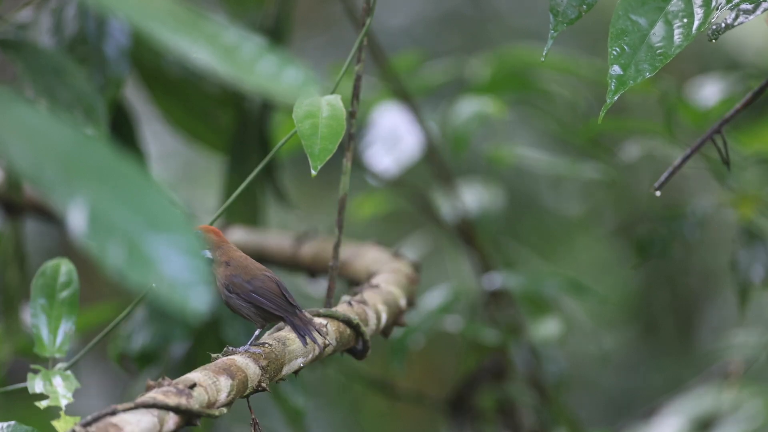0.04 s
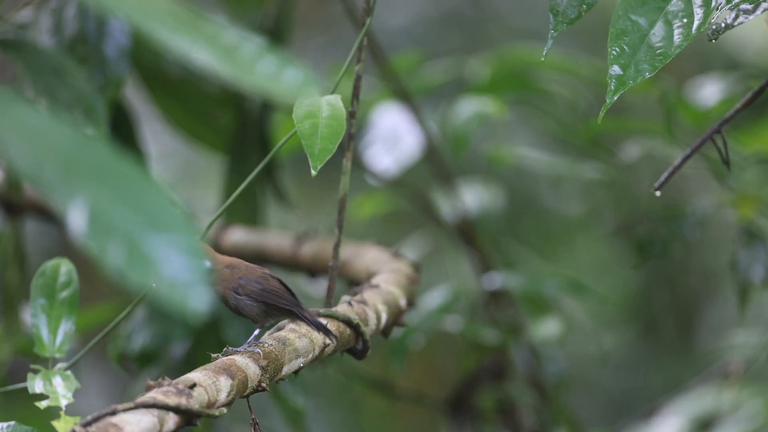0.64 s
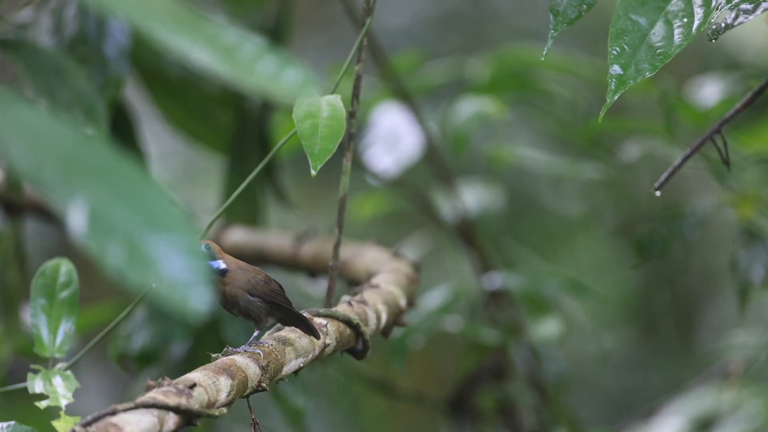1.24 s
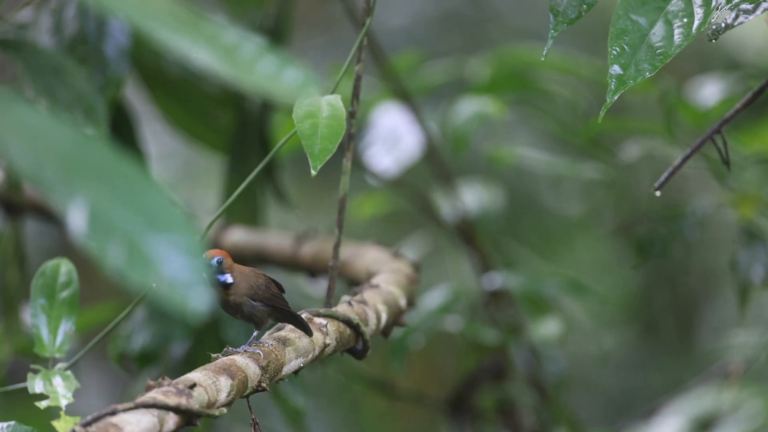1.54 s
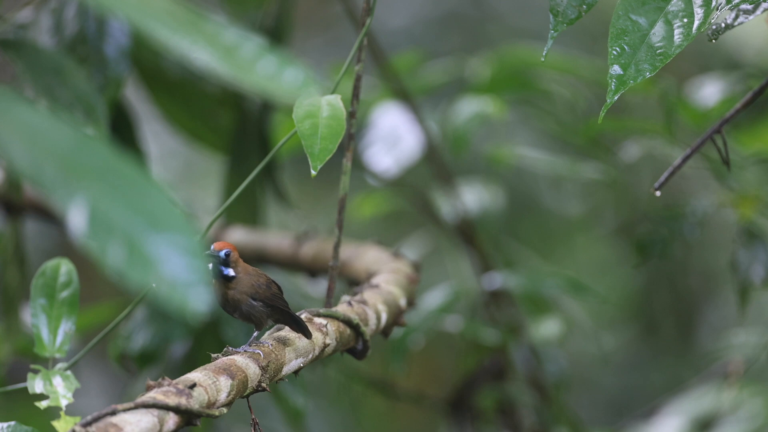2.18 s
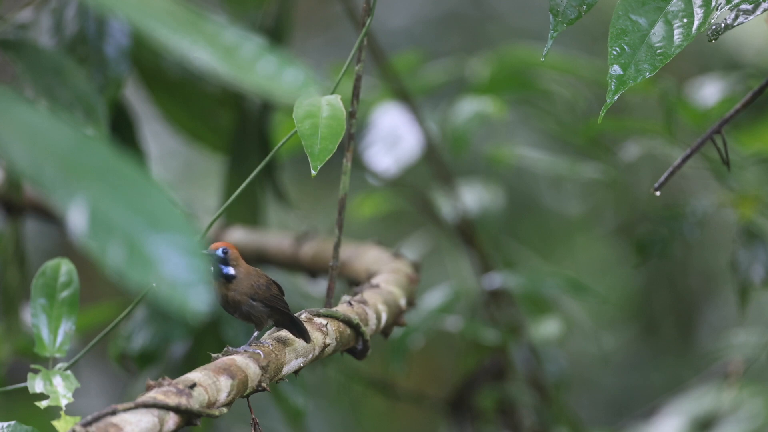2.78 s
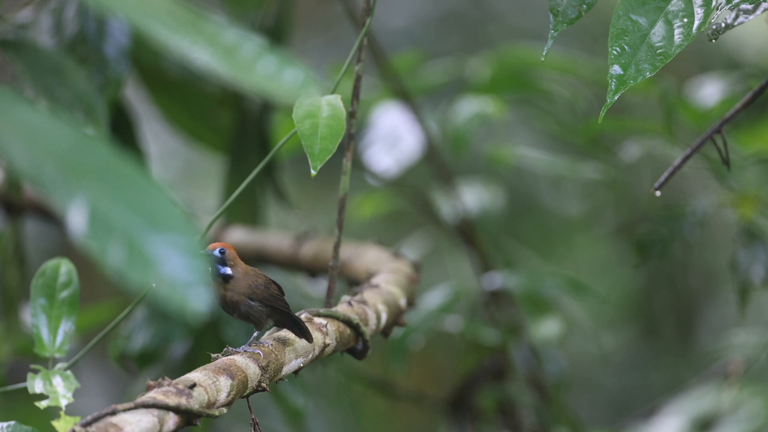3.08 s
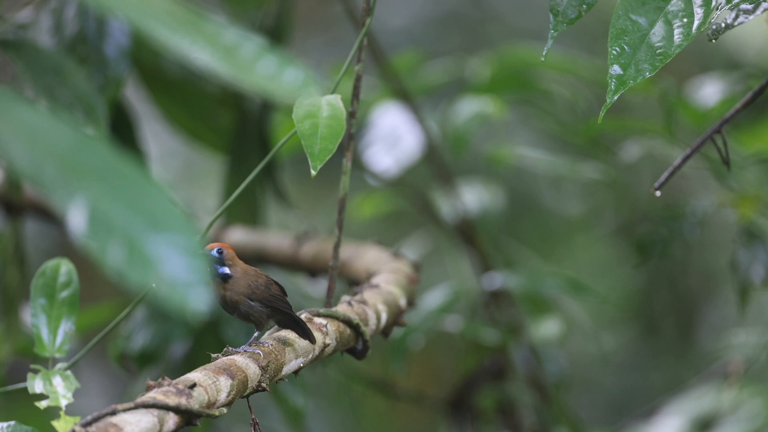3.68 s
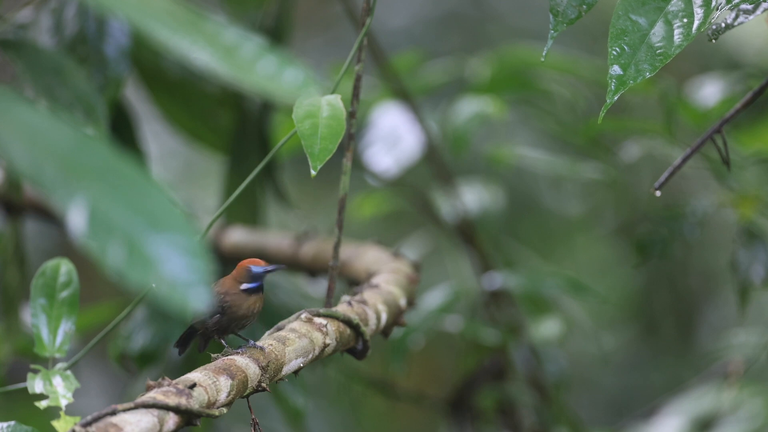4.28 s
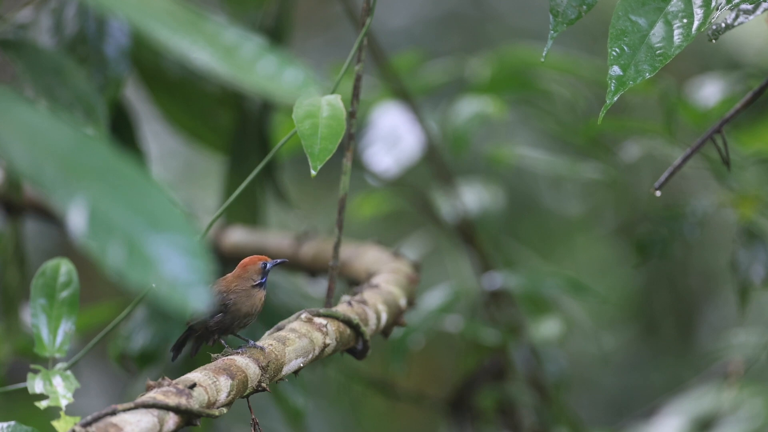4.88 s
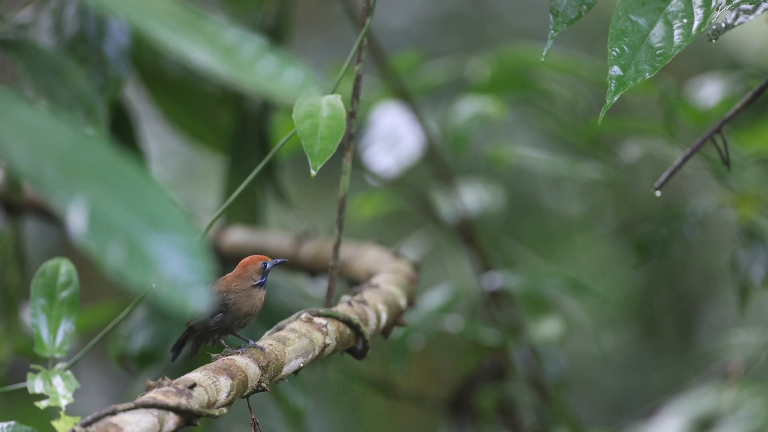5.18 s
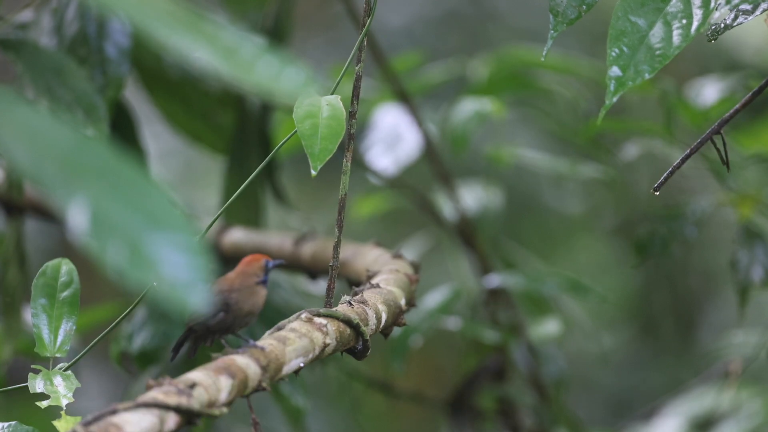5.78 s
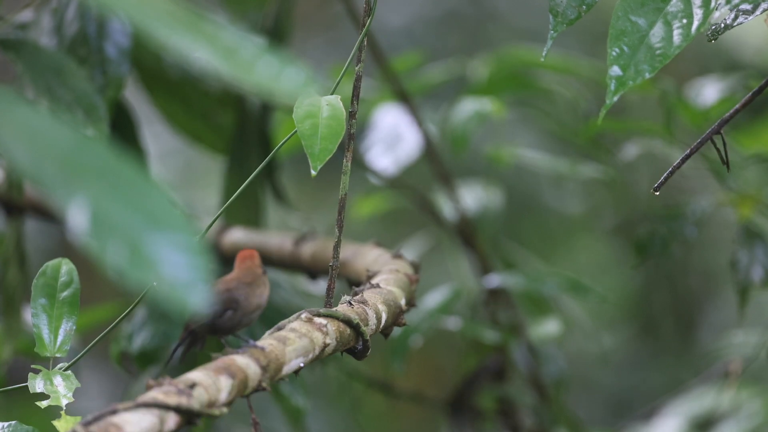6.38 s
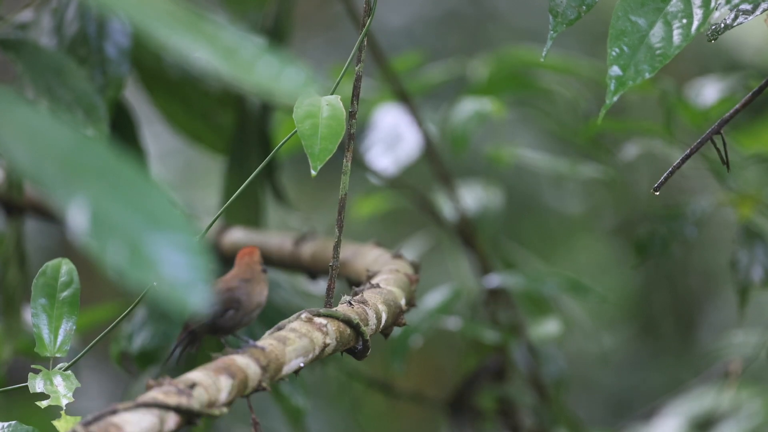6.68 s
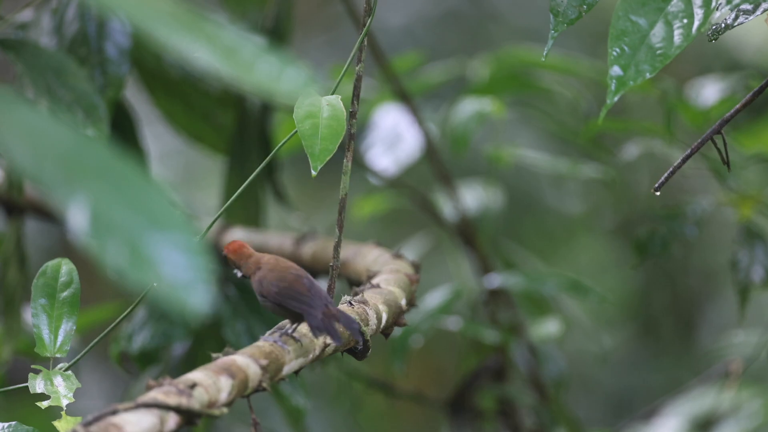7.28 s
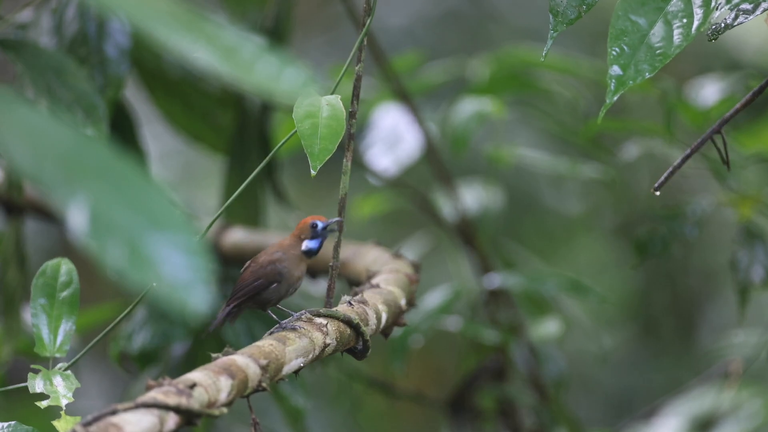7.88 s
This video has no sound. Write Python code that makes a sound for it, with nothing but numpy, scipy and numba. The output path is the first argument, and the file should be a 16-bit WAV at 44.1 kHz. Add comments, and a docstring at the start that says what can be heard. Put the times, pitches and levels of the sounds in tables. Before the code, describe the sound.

In a dense forest, insects sizzle steadily and crickets trill over a soft hush of air. Near the microphone, a small bird scolds with rough calls that climb in pitch and quick rattles of a few notes. Short bursts of soft wingbeats come in the middle, along with weaker calls and faint distant whistles and rasps. It ends with another close rattle, a flutter and a strong rising rasp.

```python
"""Harsh rising rasps and short rattles: a babbler scolds from a vine in dense forest.
Membranes in its voice box slap together, and its throat shapes the sound. Far rasps and
whistles come through the trees, and wings whirr as the birds hop about. Crickets scrape their
wings in trills over a steady insect chorus and a low wash of air.
Trunks and leaves scatter every call into a soft tail."""
import sys
import numpy as np
from scipy import signal
from scipy.fft import rfft, irfft, next_fast_len
from scipy.io import wavfile
from scipy.ndimage import uniform_filter1d
from numba import njit

SR = 44100
rng = np.random.default_rng(int(sys.argv[2]) if len(sys.argv) > 2 else 0)


def wrap_up_sound(samples):
    """Save the sound to the file named by the first command line argument, as 16-bit audio."""
    columns = np.atleast_2d(samples).T
    # keep every value between -1 and 1, then stretch to whole-number steps
    tamed = np.clip(columns, -1, 1)
    steps = np.round(tamed * 32767).astype(np.int16)
    wavfile.write(sys.argv[1], SR, steps)


N = 350154
T = np.arange(N) / SR

# The near bird's rasps. In all tables, levels are relative: each layer is scaled afterwards.
# start_s, length_s, level_db, crest_share (0 to 1 of the length), from_hz, to_hz, windpipe_hz
RASPS = [(0.199, .46, -39.5, 0.84, 2420, 3500, 2600), (1.24, .47, -39.5, 0.98, 2450, 3500, 2600),
         (4.426, 0.49, -49, 0.44, 2160, 3300, 2280), (7.445, 0.46, -39, 0.78, 2210, 3500, 2437)]
def rasps():
    """Long harsh calls that climb ever faster, and turn hissy as the beak opens wide."""
    out = np.zeros(N)
    for start, length, db, crest, from_hz, to_hz, windpipe_hz in RASPS:
        t, fade = gate(length, 0.012, 0.023)
        opening = (t / t[-1]) ** 1.76
        hz = from_hz + (to_hz - from_hz) * opening
        voice = voice_box(hz, slap_hz=431.3, jitter=.35, spread_db=1, width_hz=1000,
                          breath=0.27, rough_db=-5.5)
        # the windpipe rings on one note, which creeps up a little and fades as the beak opens
        windpipe = resonate(voice, windpipe_hz * (1 + 0.078 * opening), 91.0)
        voice = unit(voice + undb(-8 - 8.3 * opening) * windpipe)
        flutter = unit(undb(0.63 * drift(170.6, len(t))))
        hiss = undb(-28) * opening ** 2 * beak_hiss(len(t))
        loudness = undb(db + rasp_swell(t / length, crest))
        add(out, start, (voice + hiss) * flutter * fade * loudness)
    return undb(1.36) * forest(out, tail_db=-4.5)


def rasp_swell(share, crest, rise_db=15, ease_db=3.5):
    """Level in dB along a rasp: it swells quickly, rounds off at its crest, then eases."""
    crest = np.clip(crest, .1, .95)
    before = np.maximum(1 - share / crest, 0)
    after = np.maximum((share - crest) / (1 - crest), 0)
    return -rise_db * before ** 2.16 - ease_db * after


# A rattle is up to three quick notes, a pause and a closing note. Columns for the closing note:
# start_s, length_s, level_db, pitch_hz; then for the quick ones: count, spacing_s, level_db, step_hz
RATTLES = [(-0.04, .099, -50, 2230, 0, 0, 0, 0), (0.967, 0.088, -38, 2370, 2, .083, -40, -10),
           (2.028, 0.092, -40.5, 2319, 2, .083, -40.5, -54),
           (4.315, 0.083, -51.5, 2334, 3, .068, -50.5, 90), (6.455, 0.061, -55, 2016, 1, .07, -54, 100),
           (7.168, 0.092, -41.8, 2190, 2, .074, -45, 35), (7.29, 0.071, -50.5, 2150, 0, 0, 0, 0)]
def rattle_notes(lead_s=.121, quick_length_s=0.07, growth_db=1):
    """Give each note's start_s, length_s, pitch_hz, level_db; the quick notes grow louder."""
    for close, length, close_db, hz, count, spacing, quick_db, step_hz in RATTLES:
        for left in reversed(range(round(count))):
            db = quick_db + growth_db * ((count - 1) / 2 - left)
            yield close - lead_s - left * spacing, quick_length_s, hz - (left + 1) * step_hz, db
        yield close, length, hz, close_db


def rattles():
    """Short, lower barks of the same voice."""
    out = np.zeros(N)
    for start, length, hz, db in rattle_notes():
        t, fade = gate(length, 0.03, 0.031)
        arch = 1 + 0.0454 * (fade - 1)  # the pitch lifts with the pressure
        voice = voice_box(hz * arch, slap_hz=444.4, jitter=.12, spread_db=1.5, width_hz=830,
                          breath=0.32, rough_db=-6)
        # at full pressure the membranes lock into a buzzing tone
        buzz = sine(440 * (1 + 0.0765 * drift(240, len(t))))
        tone_hz = hz * (arch - .03) + 250 * buzz + 80 * drift(400, len(t))
        tone = (1 + 0.73 * buzz) * sine(tone_hz)
        voice = unit(voice + undb(-2.5) * fade * throat(tone))
        hiss = undb(-35.5) * beak_hiss(len(t))
        add(out, start, (voice + hiss) * fade * undb(db))
    return undb(0.8) * forest(out, tail_db=-9)


def voice_box(hz, slap_hz, jitter, spread_db, width_hz, breath, rough_db):
    """Membranes slap unevenly; each slap rings at the call's pitch and passes the throat."""
    size = len(hz)
    timing, strength = rng.standard_normal((size // 20, 2)).T
    at = (np.cumsum(np.exp(jitter * timing)) * SR / slap_hz).astype(int)
    slaps = np.zeros(size)
    slaps[at[at < size]] = undb(spread_db * np.clip(strength[at < size], -2, 2))
    breathy_slaps = unit(slaps) + breath * rng.standard_normal(size)
    rough_ring = resonate(breathy_slaps, hz, float(width_hz))
    smooth_ring = resonate(rough_ring, hz, float(width_hz))
    return throat(smooth_ring + undb(rough_db) * rough_ring)


# The tone of the bird's throat and beak: frequency_hz, gain_db
THROAT_TONE = [(500, -44), (950, -2), (1250, 3.5), (1500, -0.5), (1750, 3.5), (2000, -1.5), (2250, 3),
               (2470, -2), (2700, 3), (2950, -3.5), (3300, -4.5), (3700, -7), (4200, -16.5), (6000, -20)]
def throat(x):
    """The throat and beak strengthen some frequencies and weaken others."""
    return unit(colour(x, THROAT_TONE))


# The tone of the hiss: frequency_hz, gain_db
HISS_TONE = [(4000, -14), (8500, -1), (11500, -4), (14500, -5)]
def beak_hiss(size):
    """Air hisses through the open beak."""
    return noise(HISS_TONE, size)


# Far rasps, and at 1.12 s the near rattle's echo lingering among the trees; then falling whistles.
# Both: start_s, length_s, from_hz, to_hz, level_db
FAR_RASPS_AND_ECHO = [(-0.2, 0.43, 2660, 3150, -51), (1.122, 0.11, 2300, 2430, -53.5),
                      (5.592, 0.24, 1950, 3180, -60), (5.844, 0.35, 3080, 3250, -60.5),
                      (6.35, 0.22, 2520, 2640, -57.5), (6.704, 0.32, 2070, 2940, -51),
                      (6.929, 0.33, 3230, 3240, -51.5)]
FAR_WHISTLES = [(2.53, .28, 3310, 3170, -67.5), (2.87, .23, 2980, 2880, -71), (5.87, .27, 3310, 3200, -67),
                (6.18, .24, 2940, 2860, -70)]
def far_calls_and_echo():
    """Far rasps and pure whistles, and one near rattle's echo lingering among the trees."""
    harsh, pure = np.zeros(N), np.zeros(N)
    for start, length, from_hz, to_hz, db in FAR_RASPS_AND_ECHO:
        t, fade = gate(length, .5 * length, 0.05)
        hz = np.linspace(from_hz, to_hz, len(t))
        voice = voice_box(hz, slap_hz=520, jitter=.35, spread_db=2.5, width_hz=850,
                          breath=.4, rough_db=-4)
        add(harsh, start, voice * fade * undb(db))
    for start, length, from_hz, to_hz, db in FAR_WHISTLES:
        t, fade = gate(length, .1, .06)
        hz = np.linspace(from_hz, to_hz, len(t)) + 45 * drift(350, len(t))
        add(pure, start, unit(sine(hz)) * fade * undb(db))
    return forest(harsh, tail_db=2) + undb(4) * forest(pure, tail_db=0)


# Flurries of wingbeats: start_s, beats (rounded), spacing_s, thump_db, thump_hz, boom_db, rush_db
FLURRIES = [(2.758, 1.58, 0.077, -48, 310, -72, -60), (2.896, 4.05, 0.04, -47.5, 313, -64, -59),
            (3.091, 2.3, 0.08, -51, 317, -65.5, -61.5), (4.097, 4.6, .0392, -48, 316, -72, -62.5),
            (5.338, 5.9, .04, -48, 264.2, -60.5, -57), (5.613, 2.48, .081, -47, 245, -59, -60),
            (7.287, 1.8, .032, -47.5, 305, -71, -57.5), (7.383, 1, 0.039, -45.5, 310, -59, -58)]
def wings():
    """Wings beat evenly in short flurries, a little stronger in the middle of each."""
    out = np.zeros(N)
    for start, beats, spacing, thump_db, hz, boom_db, rush_db in FLURRIES:
        for k in range(round(beats)):
            taper_db = -0.5 * ((2 * k + 1) / beats - 1) ** 2
            beat = downstroke(hz, thump_db, boom_db, rush_db)
            add(out, start + k * spacing - .002, beat * undb(taper_db))
    return forest(out, tail_db=-13.5)


# The tone of air rushing through feathers: frequency_hz, gain_db
FEATHER_TONE = [(70, -26), (160, -6), (290, 3), (430, -3.5), (600, 1), (900, -8), (1500, -7), (3000, -23),
                (12000, -52)]
def downstroke(hz, thump_db, boom_db, rush_db):
    """One wingbeat gives a soft thump with a lower boom, and air rushes through the feathers."""
    t, fade = gate(0.13, 0.0095, .02)
    turn = 2 * np.pi * (t + rng.random(2)[:, None])  # each wave starts at a random point
    thump_hz = hz * (1 + .04 * rng.standard_normal())
    boom_hz = 150 * (1 + .14 * rng.standard_normal())
    thump = undb(thump_db + 1) * np.sin(thump_hz * turn[0]) * np.exp(-t / .0085)
    boom = undb(boom_db + 5) * np.sin(boom_hz * turn[1]) * np.exp(-t / .02)
    rush = undb(rush_db + 5) * noise(FEATHER_TONE, len(t)) * np.exp(-t / 0.017)
    return (thump + boom + rush) * fade


# Bright cricket trills: start_s, length_s, pitch_hz, level_db
TRILLS = [(0.0, 1.6, 6490, -72), (0.1, 1.0, 6300, -71), (2.3, .55, 6430, -70), (2.78, .38, 6370, -66),
          (3.1, .62, 6100, -65), (3.5, 1.0, 6390, -64.5), (3.7, .8, 6130, -68), (4.6, 1.0, 6150, -68),
          (4.87, .8, 6380, -64), (5.6, .6, 6400, -72), (6.18, .78, 6400, -65.5), (7.27, .8, 6390, -65.5)]
# Lower scratches, thin high buzzes and slow chirps, all: start_s, length_s, level_db
SCRATCHES = [(0.0, 2.45, -68), (2.55, 1.35, -66), (4.4, 3.7, -68)]
BUZZES = [(0.06, .22, -77), (0.71, .27, -76), (1.43, .22, -77)]
CHIRPS = [(0.0, 1.75, -71), (3.55, .45, -71), (5.0, .5, -72), (6.25, .8, -71)]
def crickets():
    """Four kinds of cricket, their pulses smeared by the leaves."""
    out = np.zeros(N)
    for start, length, hz, db in TRILLS:
        add(out, start, trill(length, hz, strokes_per_s=34, sag=.022, wobble=.006) * undb(db))
    for start, length, db in SCRATCHES:
        add(out, start, trill(length, hz=4570, strokes_per_s=20.7, sag=.07, wobble=.018) * undb(db))
    for start, length, db in BUZZES:
        add(out, start, trill(length, hz=8400, strokes_per_s=70, sag=.025, wobble=.01) * undb(db))
    for start, length, db in CHIRPS:
        add(out, start, trill(length, hz=5080, strokes_per_s=5.9, sag=.03, wobble=.02) * undb(db))
    return undb(0.5) * forest(out, tail_db=0.5)


def trill(length, hz, strokes_per_s, sag, wobble):
    """Each scrape along a cricket's ridged wing makes it ring for a moment, sagging in pitch."""
    t, fade = gate(length, 0.1, 0.13)
    pace = strokes_per_s * (1 + .015 * drift(8.56, len(t)))
    stroke = np.cumsum(pace) / SR % 1  # runs from 0 to 1 in each stroke
    pitch = hz * (1 + sag * (.5 - stroke) + wobble * drift(500, len(t)))
    return unit(np.sin(np.pi * stroke) ** 2 * sine(pitch)) * fade


# The tones of the massed insects and of the shrillest group: frequency_hz, gain_db
CHORUS_TONE = [(3200, -29.5), (3950, -16.5), (4250, -3.5), (4560, -1.5), (4900, -6.5), (5300, -2),
               (5700, 3.5), (6050, -3), (6800, -9.5), (7400, -14), (8100, -22), (9200, -22), (10600, -14.5),
               (12300, -25.5), (15500, -36)]
SHRILL_TONE = [(5500, -35), (5950, -0.5), (6150, 3.5), (6260, -5), (6400, -10), (6570, 0.5),
               (6720, -9), (7200, -51)]
# The shrill group swells and rests together: time_s, level_db
SHRILL_LEVELS = [(0.0, -58.5), (0.31, -71), (1.37, -60.5), (2.21, -76), (2.43, -68), (4.25, -62),
                 (4.53, -62.5), (5.24, -62.5), (6.02, -64), (6.41, -61.5), (6.66, -65), (6.74, -58),
                 (6.94, -64.5), (7.85, -60), (7.92, -65), (7.94, -58)]
def insect_chorus():
    """Countless far insects merge into a sizzle, with a shrill group and one thin high whine."""
    sizzle = noise(CHORUS_TONE) * undb(-60 + .5 * drift(13))
    shrill = noise(SHRILL_TONE)
    whine = unit(resonate(rng.standard_normal(N), np.full(N, 12750.), 150.))
    whine_db = -98 + 3 * drift(1.9)
    shrill_db = -4 + np.interp(T, *np.transpose(SHRILL_LEVELS)) + 2.1 * drift(35)
    return sizzle + shrill * undb(shrill_db) + whine * undb(whine_db)


# The tone of the still forest air: frequency_hz, gain_db
AIR_TONE = [(20, -48), (36, -33), (50, -14), (80, -9.5), (150, -6.5), (280, -2.5), (430, -4), (570, -1),
            (800, -3.5), (1000, -3), (1500, -3.5), (2300, -4.5), (4000, -9), (6000, -46)]
def air():
    """The low, even wash of the forest."""
    return noise(AIR_TONE) * undb(-61.5 + 0.7 * drift(2.25))


def forest(x, tail_db, tail_s=0.92):
    """Direct sound, a quick scatter from nearby leaves, and a long tail from the trunks."""
    t = np.arange(SR) / SR
    leaves, trunks = rng.standard_normal((2, SR))
    leaves = leaves * undb(-60 * t / .055) * (t > .002)
    trunks = trunks * undb(-60 * t / tail_s) * (1 - np.exp(-t / 0.015))
    echoes = undb(-5) * leaves / np.linalg.norm(leaves)
    echoes += undb(tail_db) * trunks / np.linalg.norm(trunks)
    echoes[0] += 1  # the direct sound
    return signal.fftconvolve(x, echoes / np.linalg.norm(echoes))[:N]


def undb(db):
    """Turn decibels into a multiplier."""
    return 10 ** (np.asarray(db) / 20)


def unit(x):
    """Scale to an average strength (rms) of 1."""
    return x / np.sqrt(np.mean(x ** 2) + 1e-20)


def sine(hz):
    """A pure tone that follows a changing pitch."""
    return np.sin(2 * np.pi * np.cumsum(hz) / SR)


def colour(x, tone):
    """Filter a sound by a list of (frequency_hz, gain_db) points."""
    hz, db = np.transpose(tone)
    size = next_fast_len(len(x) + 4096)
    bins_hz = np.maximum(np.arange(size // 2 + 1) * SR / size, 1)
    gain = undb(np.interp(np.log(bins_hz), np.log(hz), db))
    return irfft(rfft(x, size) * gain, size)[:len(x)]


def noise(tone, size=N):
    """Noise of strength 1 with the given tone."""
    return unit(colour(rng.standard_normal(size), tone))


def drift(rate_hz, size=N):
    """A smooth random wander with a spread near 1."""
    hold = max(int(SR / rate_hz), 1)
    steps = np.repeat(rng.standard_normal(size // hold + 2), hold)
    return 1.32 * uniform_filter1d(uniform_filter1d(steps, hold), hold)[:size]


@njit
def resonate(x, hz, width_hz):
    """A ringing filter that passes a band around a moving pitch."""
    out, band, low = np.empty(len(x)), 0., 0.
    for i in range(len(x)):
        tuning, damping = np.tan(np.pi * hz[i] / SR), width_hz / hz[i]
        ring = (band + tuning * (x[i] - low)) / (1 + tuning * (tuning + damping))
        band, low = 2 * ring - band, low + 2 * tuning * ring
        out[i] = damping * ring
    return out


def gate(length_s, rise_s, fall_s):
    """Times within a note, and its smooth fade in and out."""
    t = np.arange(int(length_s * SR)) / SR
    ramp = np.clip(np.minimum(t / rise_s, (length_s - t) / fall_s), 0, 1)
    return t, np.sin(np.pi / 2 * ramp)


def add(track, start_s, x):
    """Mix a sound into a track at a given time."""
    i = int(start_s * SR)
    x = x[max(-i, 0):max(N - i, 0)]
    track[max(i, 0):max(i, 0) + len(x)] += x


def scene():
    """Birds, insects and air, the same in both channels."""
    mono = rasps() + rattles() + far_calls_and_echo() + wings() + crickets() + insect_chorus() + air()
    return np.array([mono, mono])


def record(dry):
    """Cut away the very highest treble."""
    top_hz = 15650
    return signal.sosfilt(signal.ellip(10, .2, 70, top_hz, fs=SR, output="sos"), dry)


dry = scene()
out = record(dry)
wrap_up_sound(out)
```